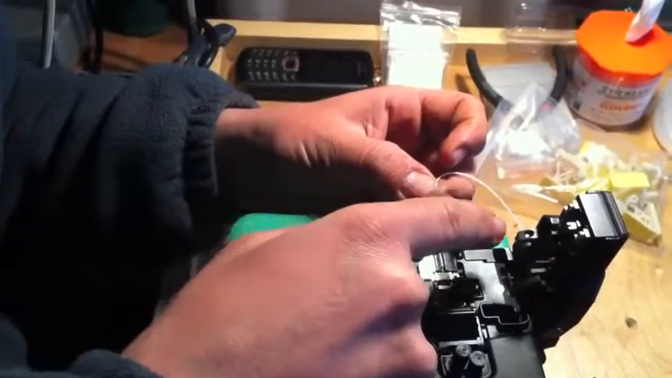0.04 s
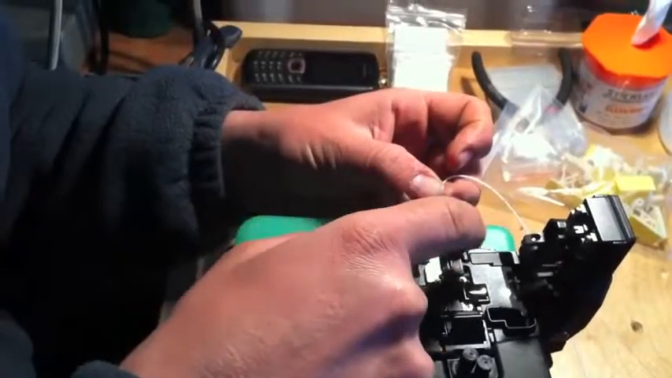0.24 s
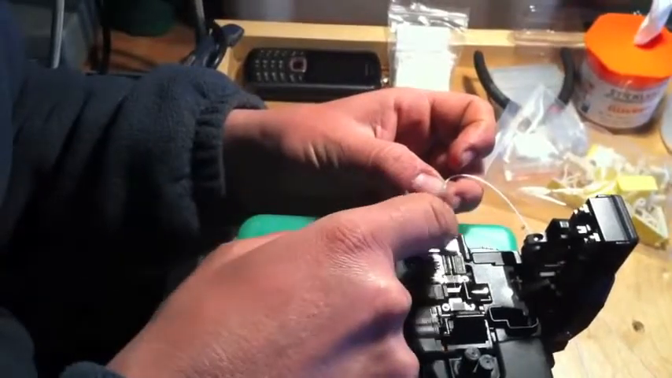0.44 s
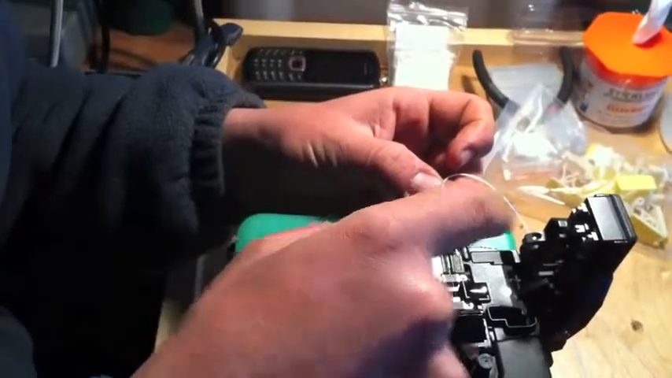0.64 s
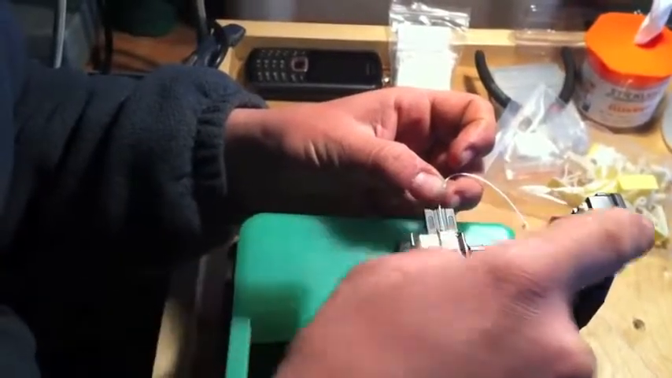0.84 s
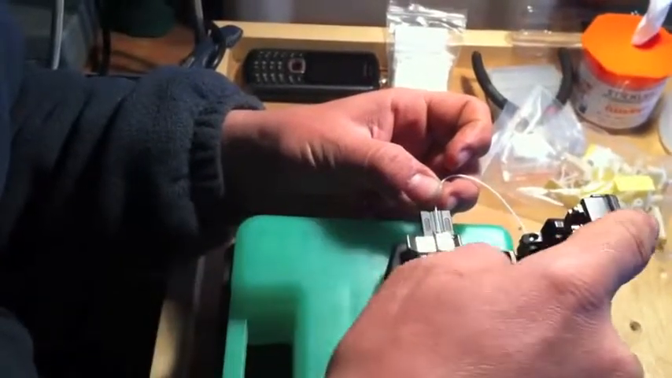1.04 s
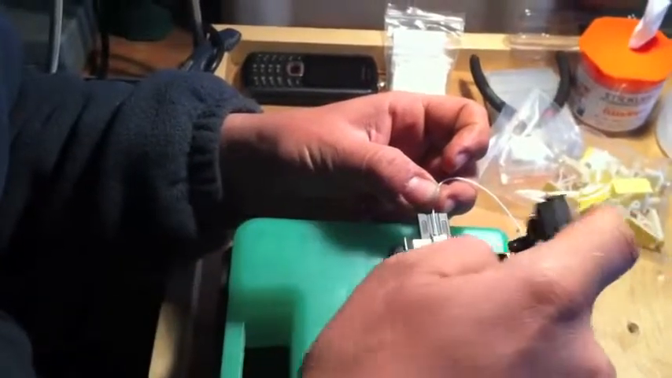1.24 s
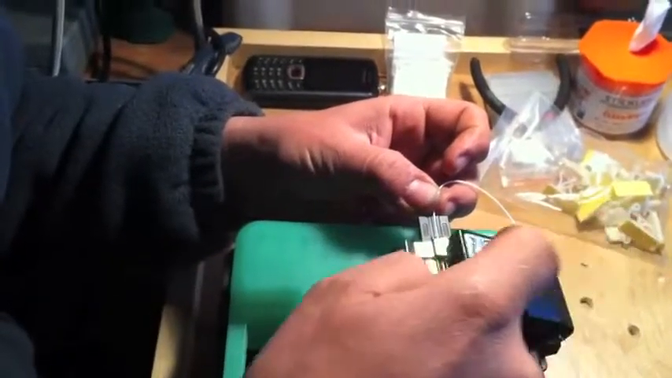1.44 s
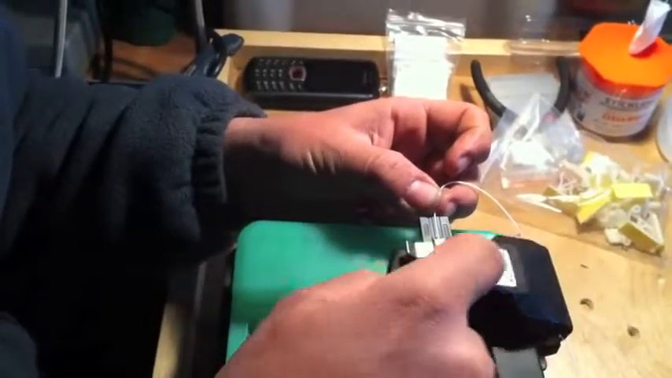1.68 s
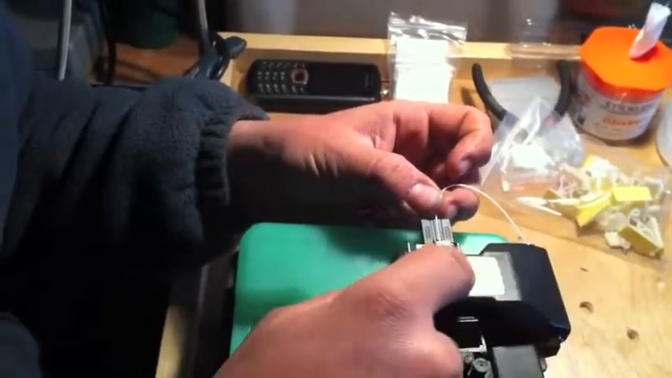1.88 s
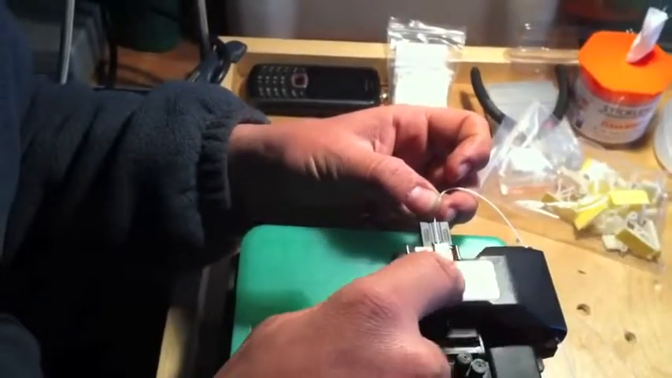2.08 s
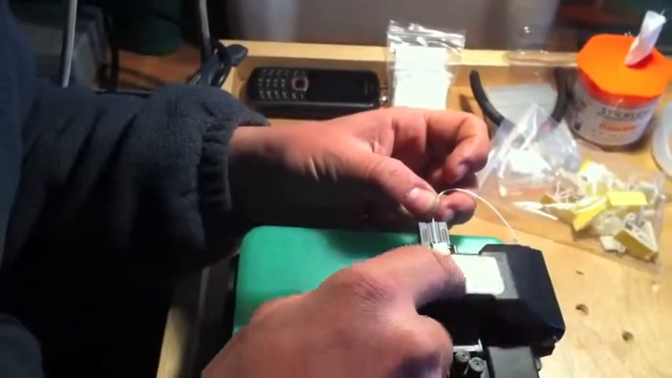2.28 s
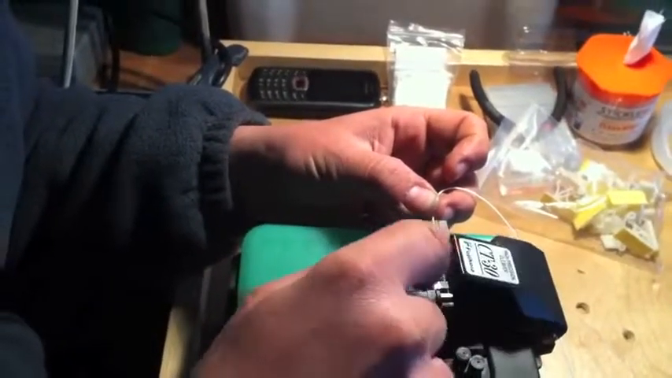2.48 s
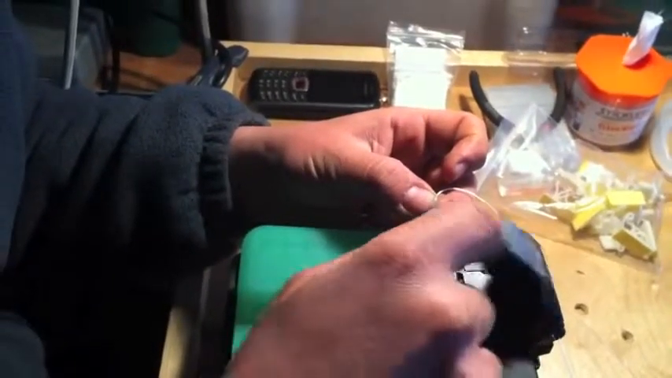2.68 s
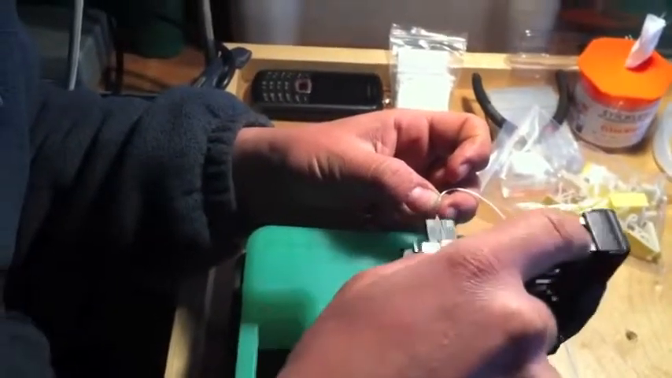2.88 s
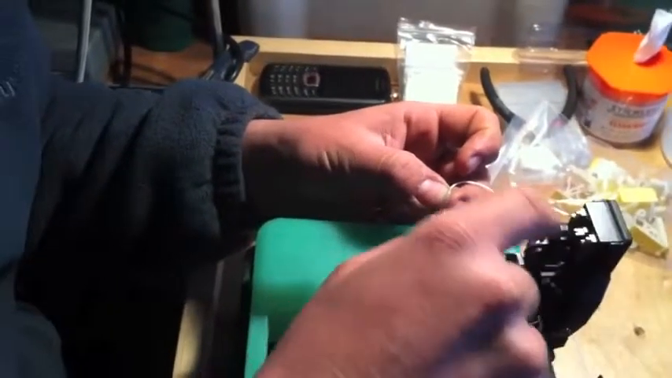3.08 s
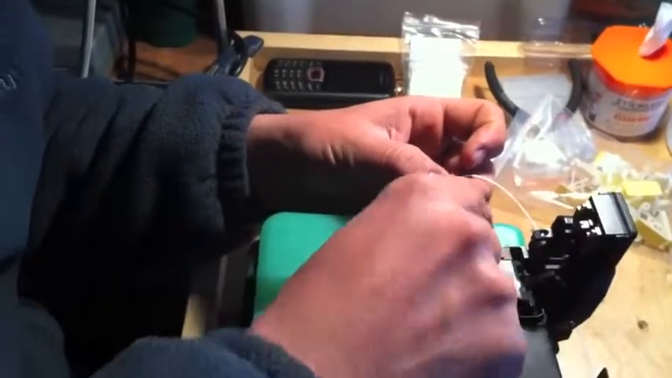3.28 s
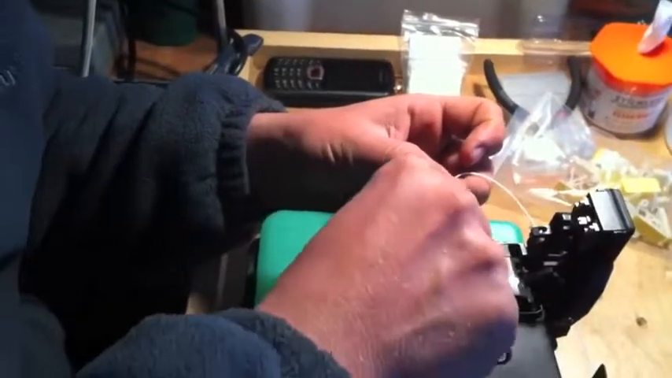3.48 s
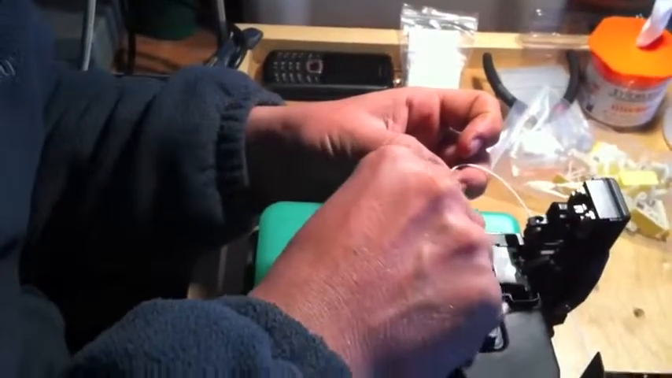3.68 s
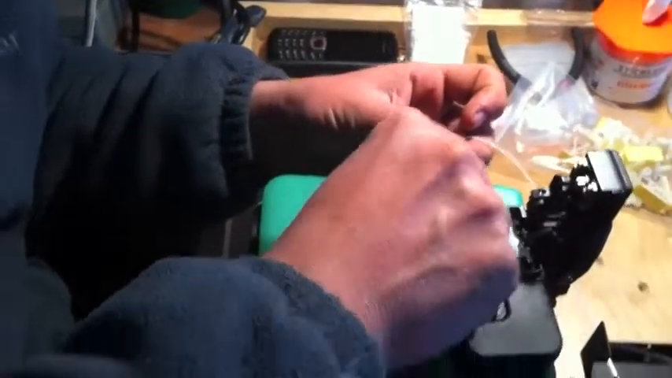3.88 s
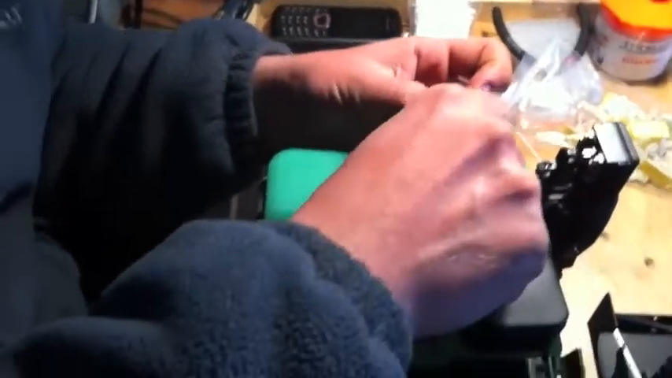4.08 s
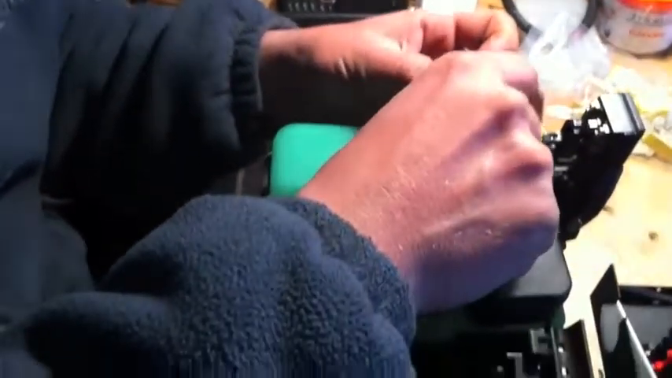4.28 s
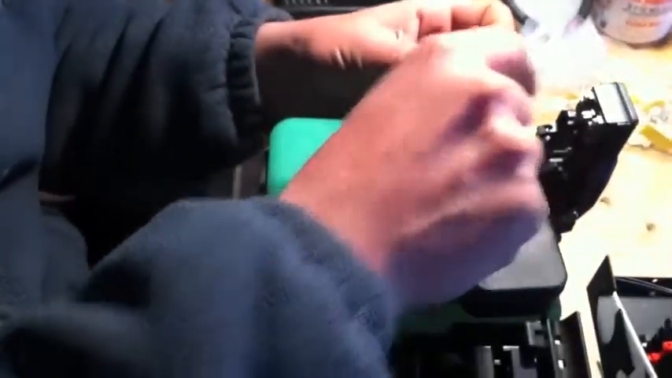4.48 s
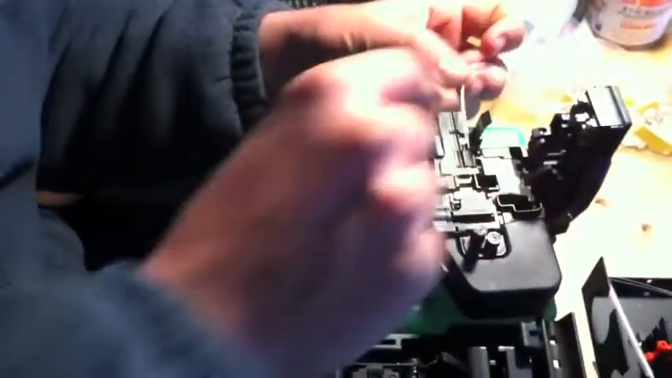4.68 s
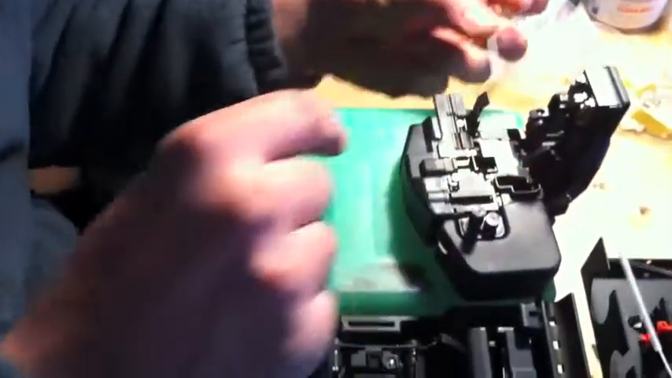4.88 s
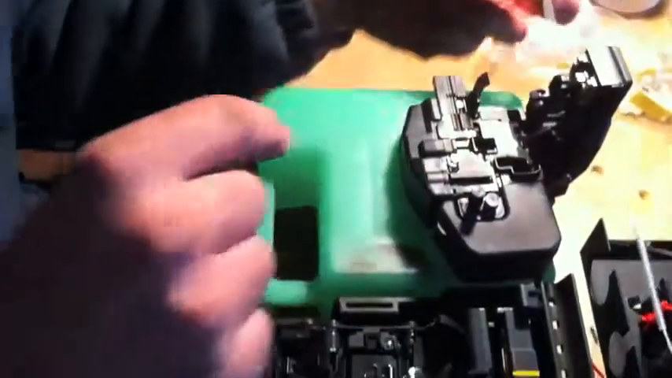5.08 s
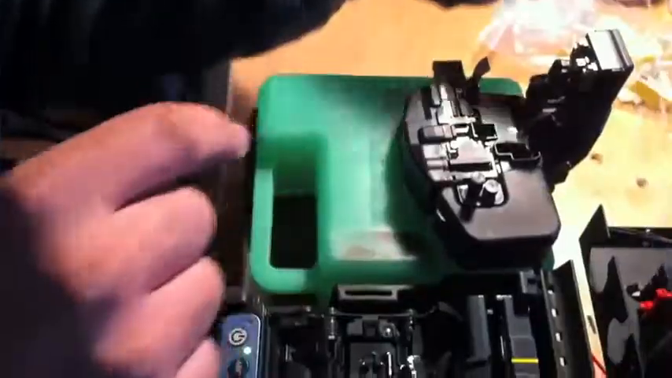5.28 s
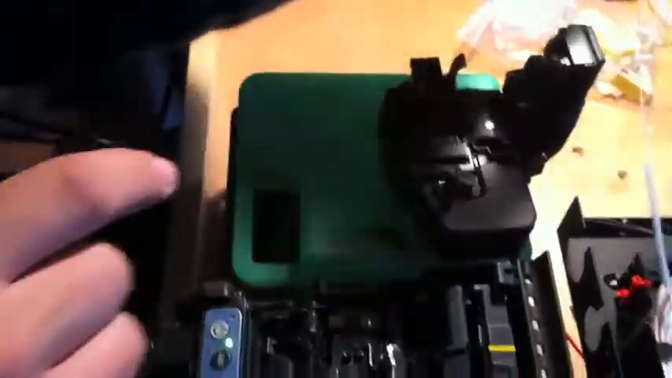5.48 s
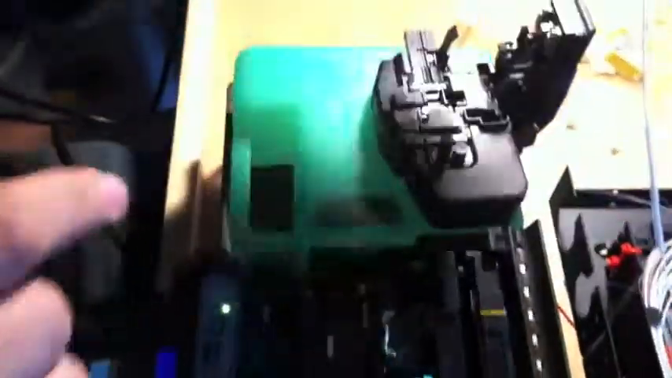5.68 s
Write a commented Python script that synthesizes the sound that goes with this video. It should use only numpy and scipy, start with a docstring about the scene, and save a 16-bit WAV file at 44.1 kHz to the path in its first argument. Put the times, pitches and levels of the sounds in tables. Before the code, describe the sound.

Close, dry handling of a small hinged plastic and metal tool on a table, with faint steady hiss. It opens with low arm rumble, sleeve rustle and a dull fingertip bump, then dry slides from 0.1 to 0.35 s and a cluster of soft knocks near 0.3 s. At 0.6 s a metal clamp snaps: short, bright, with a faint springy tail. Near quiet follows, with one slight rub at 1.2 s. At 1.6 s the closing lid scrapes and ticks, rattling briefly at 1.7 s. A small tap comes at 2.0 s; at 2.29 s the catch springs over with the loudest, hard double crack. A knock at 2.4 s and scratchy ticks at 2.5-2.6 s follow. The lid hits its stop at 3.05 s, with duller knocks around 3.25 s. A small clustered tap falls at 4.0 s, a barely audible high squeak at 4.3 s, and faint taps at 4.65 s; then soft rustle and hiss to about 5.7 s.

```python
"""Soft knocks and dry scrapes on plastic, then a metal clamp snaps home and a lid cracks shut.
A fibre cleaver is worked by hand on a table: the lid is swung shut, pressed until its catch springs over,
and swung open against its stop. Impacts are decaying modes plus filtered contact noise and reflections;
scrapes are crowds of clicks, the squeak a modulated tone, rumble, sleeve and hiss filtered noise."""
import sys
import numpy as np
from scipy import signal
from scipy.fft import rfft
from scipy.io import wavfile
from scipy.ndimage import uniform_filter1d

SR = 44100
rng = np.random.default_rng(int(sys.argv[2]) if len(sys.argv) > 2 else 0)


def put_to_file(sound):
    """Save the sound as 16-bit audio at rate SR, in the file named by the first command-line argument."""
    columns = np.atleast_2d(sound).T  # one column per channel
    safe = np.clip(columns, -1, 1)
    whole_steps = np.round(safe * 32767)
    wavfile.write(sys.argv[1], SR, whole_steps.astype(np.int16))


N = 253134  # samples

# clamp snap, band levels as energy spread over 20 ms
# [t/s, thud level/dB, knock level/dB, click level/dB, tick level/dB, chatter/s, favoured f/Hz]
CLAMP_SNAPS = [(.6034, -47, -35.5, -23, -27, 0.003, 4084)]
# metal clamp modes, incl. faint long spring modes, two of them close and beating [f/Hz, level/dB, t60/s]
STEEL_MODES = [(196.2, -14.5, 0.092), (361.6, -14, 0.08), (640, -10.5, 0.041), (1046, -2.5, 0.08),
               (1352, 1.5, .04), (2677, 2, 0.033), (3070, -7.5, .04), (3730, -1, .035), (4040, 3.5, 0.029),
               (4617, 4.5, 0.023), (5150, -2, .035), (6010, -4, 0.07), (7777, -9.5, 0.039),
               (8660, -15, 0.051), (11980, -1.5, .025), (11850, -16.5, 0.02), (14730, -3, .02),
               (2530, -32.5, .65), (2570, -39, .6), (3347, -32.5, .3), (5216, -29.5, 0.41), (6576, -40, .3),
               (7550, -33, .2)]


def metal_clamp():
    """The clamp snaps home; its metal rings and its spring sounds on faintly."""
    return strike(CLAMP_SNAPS, STEEL_MODES, crack_db=20, scatter_db=4.5, room_db=-29.5, room_t60_s=0.22,
                  edge_order=1.2, hump_share=0.062, favour_db=2.5)


# lid catch, two steps; band levels are energy spread over 20 ms
# [t/s, thud level/dB, knock level/dB, click level/dB, tick level/dB, chatter/s, favoured f/Hz]
CATCH_STEPS = [(2.2886, -33.5, -27.5, -22, -33, 0.0026, 4500), (2.2912, -34, -26.5, -24.5, -33, .004, 1616)]
# lid modes [f/Hz, level/dB, t60/s]
LID_MODES = [(136, -21.5, .12), (205, -17, 0.11), (269, -18.5, .16), (330, -9.5, .08), (418, -13, 0.097),
             (600, -17, .055), (1007, -13, .05), (1340, -5, 0.023), (1556, -3, .035), (1645, -4.5, 0.0098),
             (1920, -12, .04), (2190, -3.5, 0.033), (2376, -2, .035), (2520, -6.5, .05), (2566, -1, 0.045),
             (2910, 4, 0.042), (3290, -11.5, 0.084), (3870, -9, .035), (4450, 4, .04), (4740, 5.5, 0.029),
             (5120, -10.5, 0.044), (6050, -12, 0.053), (6780, -13.5, 0.054), (8130, -15.5, 0.043),
             (2130, -39, 0.29), (5100, -41, .28)]


def lid_catch():
    """The pressed catch springs over in two steps and rings the lid's modes."""
    return strike(CATCH_STEPS, LID_MODES, crack_db=17.5, scatter_db=0.5, room_db=-32, room_t60_s=0.34,
                  edge_order=1.9, hump_share=0.03, favour_db=1.5)


# knocks on the plastic body: fingertips soft and dull, lid on its stop hard and bright
# [t/s, force level/dB, hardness f/Hz, chatter/s, favoured f/Hz]
BODY_BLOWS = [ (.017, -44.5, 220, 0.0033, 274), (.2513, -58, 1900, 0.0053, 1880),
              (.2905, -47, 900, .002, 980), (.302, -42.5, 597, .018, 259),
              (1.9942, -54.5, 3140, 0.00028, 1100), (2.4123, -43.5, 5350, 0.0025, 1320),
              (3.0505, -43, 4700, .0031, 346), (3.2297, -47, 1007, 0.0019, 225),
              (3.272, -56.5, 4400, 0.0018, 404), (3.972, -53, 453, .0018, 149.3),
              (3.988, -46, 642, 0.003, 730), (3.9932, -48.5, 1100, 0.0018, 1370),
              (3.998, -47, 2458, .003, 3000), (4.639, -54, 1090, 0.0038, 580),
              (4.6775, -59.5, 2200, 0.0011, 650)]
# plastic body on its stand, modes [f/Hz, level/dB, t60/s]
BODY_MODES = [(123, -17, 0.33), (177, -4, 0.063), (227, -11.5, 0.094), (276, -10.5, 0.21),
              (357.6, -10, 0.11), (417.4, -12, 0.15), (516, -9, 0.051), (637, -8.5, 0.06),
              (772, -12, 0.048), (931, -0.5, 0.021), (1086, -13, 0.034), (1365, -2.5, 0.038),
              (1604, -6.5, 0.0042), (1858, -6, 0.019), (2335, -13, 0.04), (2800, -12, 0.045),
              (2900, -3.5, 0.029), (3500, -12.5, 0.042), (4696, -4.5, 0.03), (5624, -5, 0.032),
              (6260, -9.5, 0.044), (7150, -9.5, 0.046), (9200, -5, 0.03), (12490, -7, .02)]
# body's yield per band [thud, knock, click, tick level/dB]
BODY_YIELD_DB = [1.7, -0.69, -0.0041, 0.16]


def body_knocks():
    """Fingertips and the lid strike the plastic body; harder contacts keep more treble."""
    return strike(contacts(BODY_BLOWS, BODY_YIELD_DB), BODY_MODES, crack_db=23, scatter_db=9, room_db=-27.5,
                  room_t60_s=0.25, edge_order=0.63, hump_share=0.06, favour_db=10.5)


# hinge and latch ticks as the lid moves [t/s, force level/dB, hardness f/Hz, chatter/s, favoured f/Hz]
HINGE_TICKS = [ (1.6095, -51.5, 9000, 0.0019, 3700), (1.6205, -49.5, 9700, 0.0018, 180),
               (1.6442, -55, 7000, 0.0022, 5100), (2.2685, -54.5, 9500, 0.0049, 4800),
               (2.285, -46, 8000, .003, 1400), (2.5037, -56.5, 5000, 0.0093, 4100),
               (2.53, -66, 12000, 0.0045, 7400), (2.557, -56, 4500, .003, 1400),
               (2.8045, -61.5, 9000, .0018, 200)]
# hinge modes [f/Hz, level/dB, t60/s]
HINGE_MODES = [(182, -12.5, 0.16), (258, -17, 0.038), (1380, -5.5, 0.066), (1650, -12.5, .03),
               (2170, -9.5, .03), (2900, -3, 0.038), (3750, -2.5, 0.051), (4731, 0, 0.018), (5002, -1, .04),
               (7300, -7.5, 0.034), (9150, -4, 0.076), (11500, -9.5, .03)]
# hinge's yield per band [thud, knock, click, tick level/dB]
HINGE_YIELD_DB = [-6, -7, 0.07, .5]


def hinge_ticks():
    """Hinge and latch tick and the lid rattles; all ring the hinge's modes."""
    return strike(contacts(HINGE_TICKS + rattles(), HINGE_YIELD_DB), HINGE_MODES, crack_db=19.5, scatter_db=3.5,
                  room_db=-24, room_t60_s=0.25, edge_order=1.0, hump_share=0.055, favour_db=4.5)


# lid rattling in its hinge at the end of a swing [t/s, gap/s, first force level/dB, step per bounce/dB]
LID_RATTLES = [(1.693, .016, -59, -5), (2.6013, 0.0097, -64, 1.5)]


def rattles(count=3, hardness_hz=5260, chatter_s=0.0038, spot_hz=3700):
    """Evenly spaced bounces of the loose lid, each a step weaker or stronger than the last."""
    bounces = []
    for start_s, gap_s, force_db, step_db in LID_RATTLES:
        for k in range(count):
            bounces.append((start_s + k * gap_s, force_db + k * step_db, hardness_hz, chatter_s, spot_hz))
    return bounces


# dry sliding of hinge and fingertips [t/s, length/s, level/dB, tilt/(dB per octave)]
SLIDES = [(0.131, .022, -60, -3), (.196, 0.065, -56.5, -9.5), (0.299, 0.056, -57.5, -5),
          (1.202, 0.033, -69.5, -4.5), (1.603, 0.084, -57.5, -1), (2.263, 0.036, -49.5, -4),
          (2.519, 0.07, -54, -2.5), (2.78, 0.078, -67.5, -4.5), (3.218, 0.017, -63, -3),
          (4.613, 0.092, -72.5, 0.5)]
# colour of dry sliding on the tool [f/Hz, level/dB per Hz]
SLIDE_COLOUR = [(100, -24), (700, -10), (1400, 2), (1850, -3.5), (2900, 1), (3800, -0.5), (4700, -1),
                (6500, -1), (9300, -2), (12500, -9), (16000, -21)]


def scrapes(slips_per_s=1100, spread_db=2.0):
    """Surfaces stick and slip in a crowd of tiny uneven clicks."""
    out, t = np.zeros(N), np.arange(SR // 5) / SR
    for start_s, length_s, level_db, tilt_db in SLIDES:
        attack = np.minimum(t / 0.0043, 1)
        release = np.exp(-np.maximum(t - length_s + 0.006, 0) / 0.005)
        slipping = rng.random(len(t)) < slips_per_s / SR
        slip_db = spread_db * np.minimum(rng.exponential(1, len(t)), 3)
        clicks = slipping * gain_of(slip_db) * rng.choice([-1, 1], len(t))
        grit = clicks + 0.1 * rng.standard_normal(len(t))
        tilted = [(hz, db + tilt_db * np.log2(hz)) for hz, db in SLIDE_COLOUR]
        add(out, start_s, gain_of(level_db) * attack * release * evened(colour(grit, tilted)))
    return out


def squeak(start_s=4.32, length_s=0.17, level_db=-74.5, first_hz=4350, last_hz=4000, width_hz=170):
    """Faint friction as the hand lifts away: a falling tone times low-passed noise."""
    out, u = np.zeros(N), np.linspace(0, 1, round(length_s * SR))
    low_pass = signal.butter(2, width_hz, fs=SR, output="sos")
    waver = signal.sosfilt(low_pass, rng.standard_normal(len(u)))
    pitch_hz = first_hz + (last_hz - first_hz) * u
    tone = np.sin(2 * np.pi * np.cumsum(pitch_hz) / SR)
    add(out, start_s, gain_of(level_db) * np.sin(np.pi * u) * evened(waver * tone))
    return out


# table rumble from the arms, before trim [t/s, level/dB]
ARM_MOTION = [(0.0, -46.5), (0.21, -51), (0.42, -52.5), (0.62, -65.5), (0.91, -63.5), (1.49, -62),
              (2.03, -62), (2.24, -64.5), (2.49, -56.5), (3.24, -58.5), (3.74, -64), (4.44, -66.5),
              (4.89, -65), (5.32, -63), (5.48, -68), (5.74, -66)]
# table rumble spectrum [f/Hz, level/dB per Hz]
RUMBLE_COLOUR = [(20, -29.5), (55, -32.5), (85, -11), (115, -8.5), (148, 3.5), (200, -2), (270, -4),
                 (350, -8), (500, -19), (800, -24), (1500, -43), (4000, -71.5)]
# sleeve rustle before trim [t/s, level/dB]
SLEEVE_MOTION = [(0.0, -64), (0.17, -61), (0.34, -68.5), (0.51, -66), (0.65, -74.5), (1.32, -73.5),
                 (2.35, -69), (2.46, -67), (2.75, -68.5), (3.97, -69), (4.4, -65), (5.74, -69)]
# fleece sleeve spectrum [f/Hz, level/dB per Hz]
SLEEVE_COLOUR = [(150, -25), (400, 4), (700, 2), (1200, -3.5), (2300, -8), (4000, -12.5), (7000, -13.5),
                 (16000, -24.5)]


def handling(rumble_trim_db=2, sleeve_trim_db=-2, catching_db=1.4):
    """Moving arms stir the table's low resonances and brush the sleeve along, its cloth catching unevenly."""
    t = np.arange(N) / SR
    catching = evened(uniform_filter1d(rng.standard_normal(N), size=600))
    rumble_db = rumble_trim_db + np.interp(t, *np.transpose(ARM_MOTION))
    rumble = gain_of(rumble_db) * noise(RUMBLE_COLOUR)
    sleeve_db = sleeve_trim_db + np.interp(t, *np.transpose(SLEEVE_MOTION)) + catching_db * catching
    sleeve = gain_of(sleeve_db) * noise(SLEEVE_COLOUR)
    return rumble + sleeve


# microphone hiss spectrum [f/Hz, level/dB per Hz]
HISS_COLOUR = [(20, 12.5), (80, 12.5), (300, 10), (800, 6.5), (2000, 1.5), (5000, 0.5), (10000, -4),
               (15500, -3)]


def microphone_hiss(level_db=-69):
    """Steady noise of the microphone."""
    return gain_of(level_db) * noise(HISS_COLOUR)


def strike(rows, modes, crack_db, scatter_db, room_db, room_t60_s, edge_order, hump_share, favour_db):
    """Parts meet and chatter briefly; the modes swell during the contact and then ring out."""
    out, t = np.zeros(N), np.arange(SR // 2) / SR
    for start_s, *levels_db, chatter_s, spot_hz in rows:
        struck = [(hz, db + favour_db * np.exp(-(np.log2(hz / spot_hz) / 0.28) ** 2), t60_s)
                  for hz, db, t60_s in modes]
        ring = np.zeros(len(t))
        for hz, db, t60_s in struck:
            ring += gain_of(db) * decay(t, t60_s) * np.sin(2 * np.pi * (hz * t + rng.random()))
        swell = 1 - np.exp(-t / (0.13 * chatter_s))
        contact = np.exp(-(t / chatter_s) ** edge_order)
        crack = gain_of(crack_db) * contact * rng.standard_normal(len(t))
        near = gain_of(scatter_db) * scatter(t) * (1 - np.exp(-t / 0.0036))
        room = gain_of(room_db) * far_room(t, room_t60_s)
        direct = swell * ring + colour(crack, humps(struck, hump_share))
        # sound from all sides of the part is more even: wider humps
        reflected = colour(near + room, humps(modes, 1.8 * hump_share))
        add(out, start_s, weigh(direct + reflected, levels_db))
    return out


# edges of the thud, knock, click and tick bands [f/Hz]
BAND_EDGES_HZ = [80, 520, 1900, 6000, 16000]


def contacts(rows, yield_db, softness_order=3.0, spot_db=6, spot_octaves=1.1):
    """A soft contact loses its treble; the spot that is hit lifts the bands round its own resonance."""
    edges = np.array(BAND_EDGES_HZ)
    centre_hz, out = np.sqrt(edges[:-1] * edges[1:]), []
    for start_s, force_db, hardness_hz, chatter_s, spot_hz in rows:
        soft_db = -10 * np.log10(1 + (centre_hz / hardness_hz) ** softness_order)
        lift_db = spot_db * np.exp(-(np.log2(centre_hz / spot_hz) / spot_octaves) ** 2)
        levels_db = force_db + np.array(yield_db) + soft_db + lift_db
        out.append((start_s, *levels_db, chatter_s, spot_hz))
    return out


def weigh(sound, levels_db):
    """Filters a blow towards its thud, knock, click and tick levels, in two passes."""
    hz, edges = np.fft.rfftfreq(len(sound), 1 / SR), np.array(BAND_EDGES_HZ)
    centre_hz = np.sqrt(edges[:-1] * edges[1:])
    for _ in range(2):
        power = 2 * abs(rfft(sound)) ** 2 / (len(sound) * 0.02 * SR)  # energy spread over 20 ms
        has_db = [10 * np.log10(power[(hz >= lo) & (hz < hi)].sum() + 1e-20)
                  for lo, hi in zip(edges[:-1], edges[1:])]
        sound = colour(sound, list(zip(centre_hz, np.array(levels_db) - has_db)))
    return sound


# contact noise of the parts [f/Hz, level/dB]
CONTACT_COLOUR = [(30, -40), (70, -18.5), (130, -5.5), (400, -6), (700, -3), (1300, -4), (2800, -2.5),
                  (4700, -1), (7000, 0), (11500, 0), (16000, -4)]


def humps(modes, share):
    """Spectrum of chatter in a part: one hump round each mode, its width a share of the pitch."""
    grid_hz = np.geomspace(30, 17000, 400)
    power = sum(gain_of(db) ** 2 / (1 + ((grid_hz - hz) / (share * hz)) ** 2) for hz, db, _ in modes)
    return list(zip(grid_hz, 10 * np.log10(power) + read(CONTACT_COLOUR, grid_hz)))


# ringing of the close surroundings [f/Hz, t60/s]
NEAR_T60 = [(100, 0.22), (400, 0.18), (1000, 0.1), (4000, 0.074), (7000, 0.09), (10000, .06),
            (15000, 0.075)]


def scatter(t, size=128):
    """Dense reflections from the table and its clutter: noise with a decay time per frequency."""
    hz, at_s, z = signal.stft(rng.standard_normal(len(t)), SR, nperseg=size)
    fade_db = -60 * at_s / read(NEAR_T60, hz)[:, None]
    return signal.istft(z * gain_of(fade_db), SR, nperseg=size)[1][:len(t)]


# farther room's return, weak in treble [f/Hz, level/dB]
ROOM_COLOUR = [(100, 0), (3000, -2.5), (5500, -2.5), (7500, -7), (10000, -9), (16000, -13)]


def far_room(t, t60_s):
    """Decaying noise of the farther room, which gives back little treble."""
    return decay(t, t60_s) * colour(rng.standard_normal(len(t)), ROOM_COLOUR)


def decay(t, t60_s):
    """Exponential decay by 60 dB in t60_s."""
    return np.exp(-np.log(1000) * t / t60_s)


def noise(points):
    """Steady noise of the given spectrum, rms 1."""
    return evened(colour(rng.standard_normal(N), points))


def colour(x, points, size=4096):
    """Causal minimum-phase filter with the given spectrum, so that attacks stay sharp."""
    log_gain = np.log(gain_of(read(points, abs(np.fft.fftfreq(size, 1 / SR)))))
    response = np.exp(np.conj(signal.hilbert(log_gain)))
    taps = np.fft.ifft(response).real[:size // 2]
    return signal.fftconvolve(x, taps)[:len(x)]


def read(points, hz):
    """Reads a curve along a log-frequency axis."""
    f, value = np.transpose(points)
    return np.interp(np.log(hz + 1), np.log(f + 1), value)


def gain_of(db):
    """Decibels to gain."""
    return 10 ** (np.asarray(db) / 20)


def evened(x):
    """Scales to rms 1."""
    return x / np.sqrt(np.mean(x ** 2) + 1e-20)


def add(mix, start_s, sound):
    """Lays a sound into the mix at start_s."""
    part = mix[max(round(start_s * SR), 0):][:len(sound)]
    part += sound[:len(part)]


def scene():
    """Clamp, catch, knocks and hinge ticks over scrapes, squeak, handling and a faint hiss."""
    impacts = metal_clamp() + lid_catch() + body_knocks() + hinge_ticks()
    friction = scrapes() + squeak()
    return (impacts + friction + handling() + microphone_hiss())[None]


def record(dry, ceiling=0.62, low_cut_hz=72, edge_hz=16200):
    """The small microphone loses deep bass and rounds off the sharpest peaks; then the band limit."""
    thin = signal.sosfilt(signal.butter(3, low_cut_hz, "high", fs=SR, output="sos"), dry)
    held = thin / (1 + (thin / ceiling) ** 6) ** (1 / 6)
    band_limit = signal.firwin(255, edge_hz, window=("kaiser", 9), fs=SR)
    return signal.oaconvolve(held, band_limit[None], "same")


dry = scene()
out = record(dry)
put_to_file(out)
```